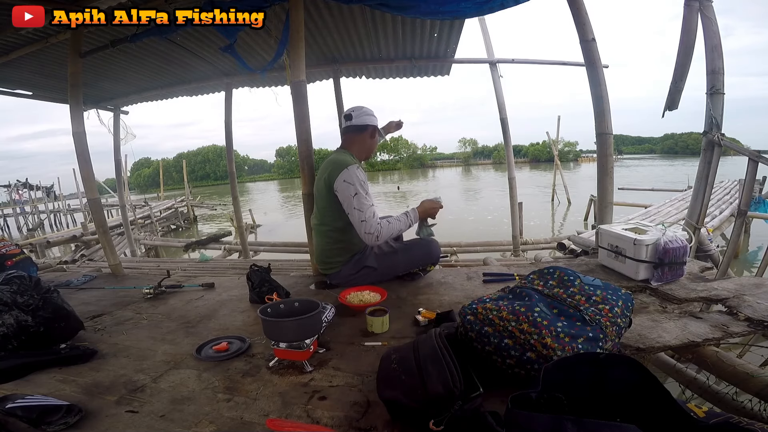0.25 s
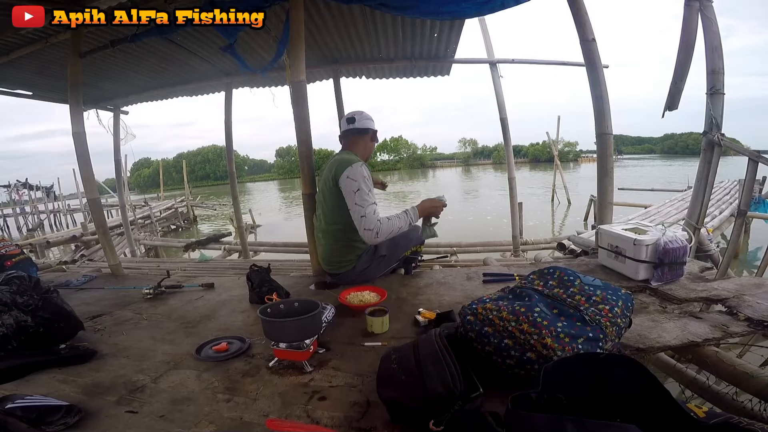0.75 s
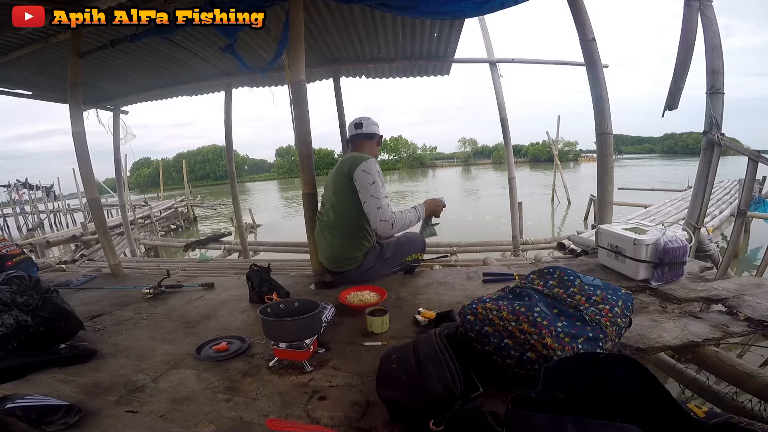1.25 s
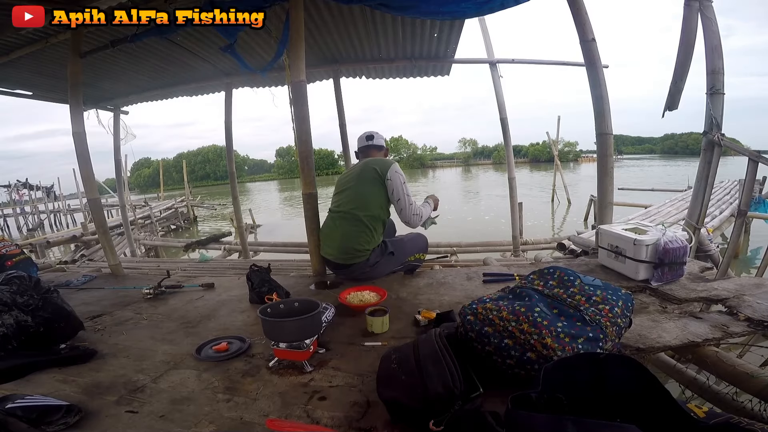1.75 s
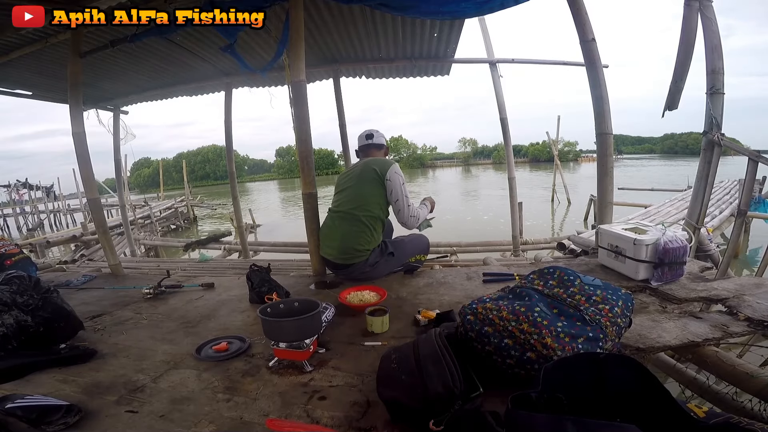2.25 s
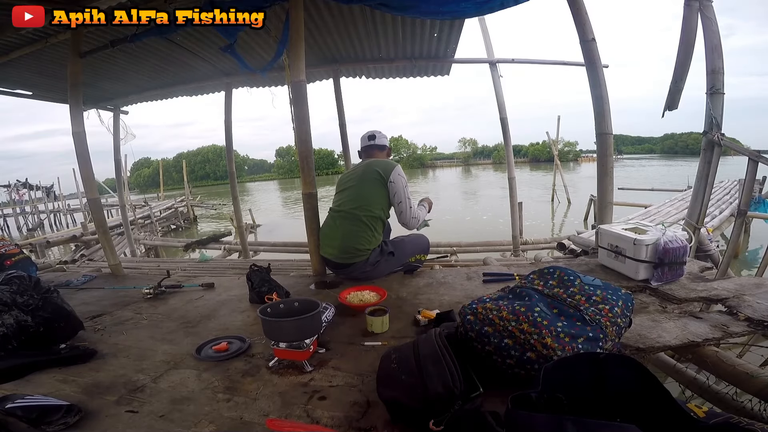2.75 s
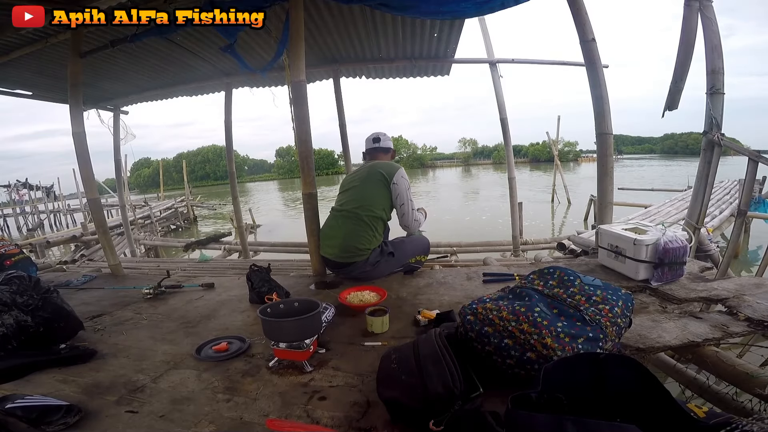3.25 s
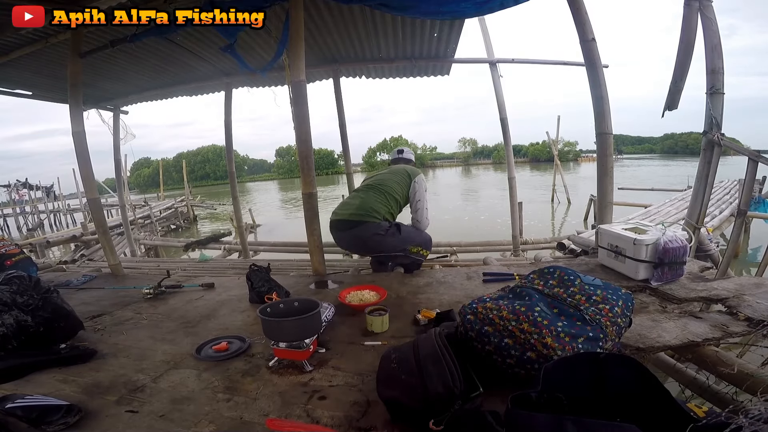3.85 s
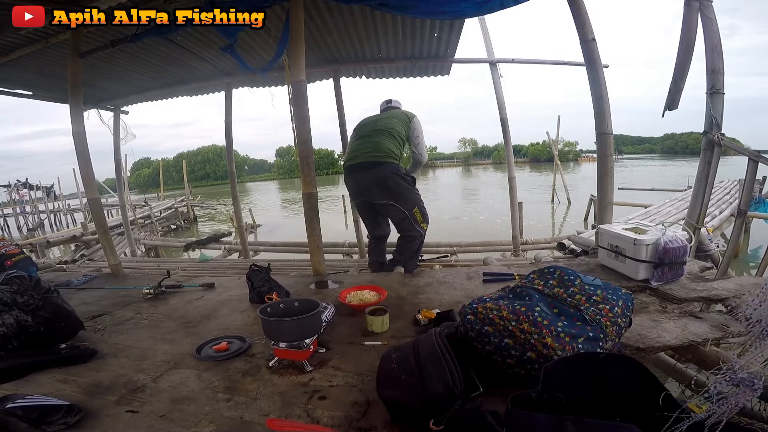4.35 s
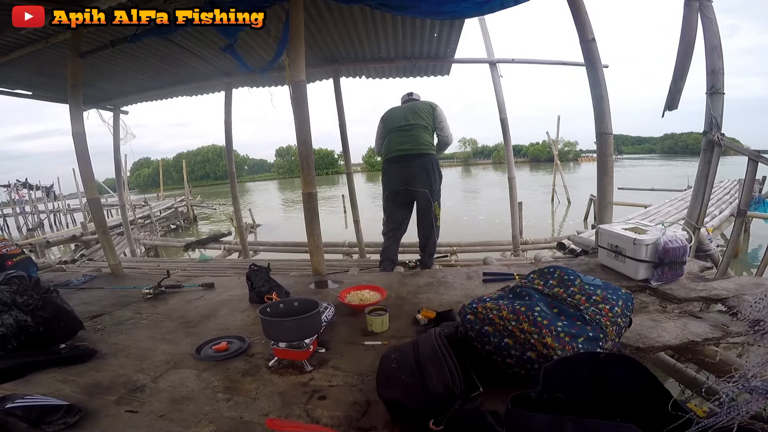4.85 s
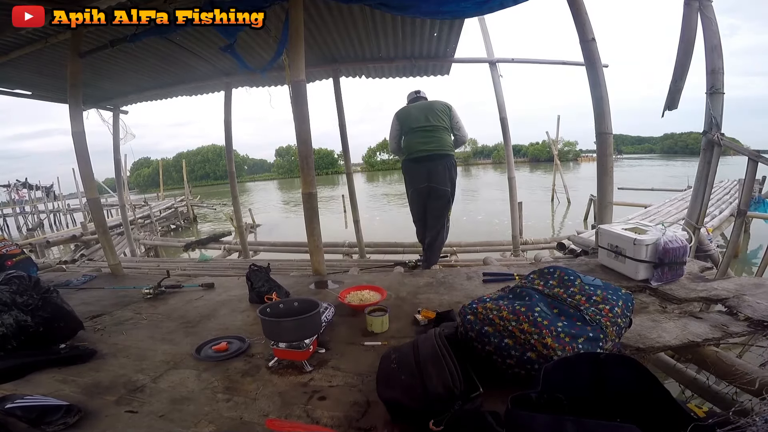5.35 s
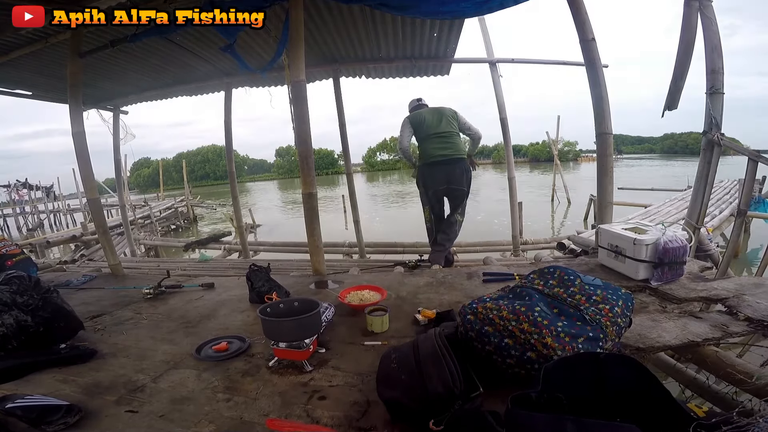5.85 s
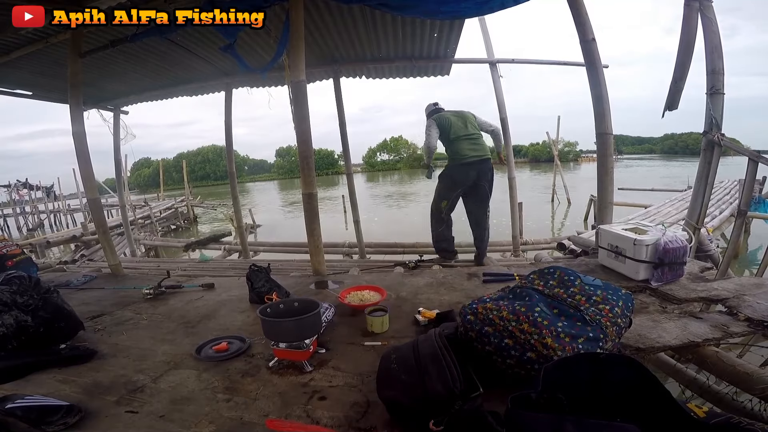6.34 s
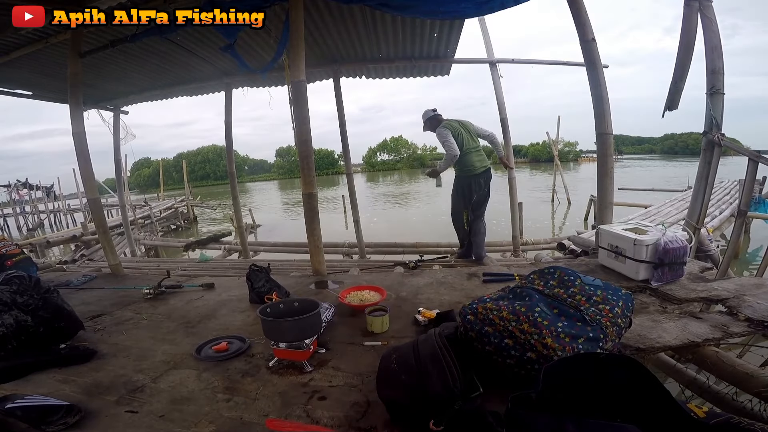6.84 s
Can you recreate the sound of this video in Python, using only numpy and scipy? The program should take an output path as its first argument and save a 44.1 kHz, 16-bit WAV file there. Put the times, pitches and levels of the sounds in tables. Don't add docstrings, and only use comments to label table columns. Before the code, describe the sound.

On an open waterside bamboo deck, a seated person shifts with dry cane cracks, faint cloth rubs and soft hollow knocks. After a quieter spell they rise and step, the deck giving deep booming thuds and a loud crack, then settling into lighter creaks. A far engine hums and ticks quickly beneath air and water hiss. The microphone rests on the deck, so low sway is strong.

```python
import sys
import numpy as np
from scipy import signal
from scipy.io import wavfile
from scipy.ndimage import uniform_filter1d

SR = 44100
rng = np.random.default_rng(int(sys.argv[2]) if len(sys.argv) > 2 else 0)


def wav_out(sig):
    wavfile.write(sys.argv[1], SR, np.round(np.clip(np.atleast_2d(sig).T, -1, 1) * 32767).astype(np.int16))


def nominal_scale(level):
    x = np.asarray(level, float) / 20
    return 10 ** x


N = 312228


def evened(x):
    return x / np.sqrt(np.mean(x ** 2) + 1e-20)


def add(mix, start_s, sound):
    part = mix[max(round(start_s * SR), 0):][:len(sound)]
    part += sound[:len(part)]


def ring(x, modes, shift=0.99, order=1):
    out = np.zeros(len(x))
    for hz, width_hz, db in modes:
        radius = np.exp(-np.pi * width_hz / SR)
        pole = radius * np.exp(2j * np.pi * hz * shift / SR)
        part = x + 0j
        for _ in range(order):
            part = signal.lfilter([1 - radius], [1, -pole], part)
        out += nominal_scale(db) * part.real
    return out


def summed(db):
    return 10 * np.log10(np.sum(10 ** (db / 10), axis=0))


def shaking(t):
    # top_s, sway_db, length_s, rocking_db (relative to sway)
    heaves = [(0.262, -49, 0.053, -6), (0.386, -38.5, 0.12, -17), (0.51, -37.5, .08, -24),
              (0.627, -40.5, 0.027, 8.5), (0.702, -33, 0.068, -15), (0.82, -37, 0.067, -8),
              (1.026, -37.5, 0.072, -4), (1.19, -37.5, 0.074, 1.5), (1.304, -54.5, .07, 16),
              (1.454, -46, 0.052, 9.5), (1.622, -34, 0.077, -3), (1.793, -42, 0.082, -7),
              (2.034, -39.5, 0.073, -9), (2.423, -42.5, 0.062, -16), (3.535, -46.5, 0.11, 3.5),
              (3.798, -27, 0.046, -6), (3.882, -26, 0.042, -9.5), (4.096, -37, 0.095, -4.5),
              (4.416, -36.5, .12, -18), (4.79, -20, 0.035, -8), (4.859, -24.5, 0.04, 2.5),
              (4.92, -26, 0.076, -5.5), (5.17, -32, 0.17, -1.5), (5.376, -17, .1, -13.5),
              (5.52, -22.5, 0.11, -3.5), (5.767, -36.5, 0.15, -1), (5.995, -33, 0.11, 2.5),
              (6.246, -35.5, 0.18, -13.5), (6.523, -35.5, .15, -5), (6.91, -35.5, 0.35, -8.5)]
    # top_s, beam_db, slat_db (relative to beam), die_away_db_per_s
    thuds = [(.30, -46.5, -21, 250), (.45, -44.5, -21.5, 150), (.68, -48, -12.5, 100), (.85, -53.5, -4, 80),
             (.95, -57, -6, 150), (1.2, -45.5, -3, 117), (1.32, -49, -18, 200), (1.6, -44.5, -23, 150),
             (1.73, -54.5, -30, 150), (1.91, -51.5, -12, 75), (2.52, -52.5, -27, 80), (2.64, -56, -8.5, 33),
             (3.69, -41, -13, 90), (3.81, -34.5, -17, 350), (3.881, -34.5, -26, 293),
             (4.1, -45.5, -30, 135), (4.32, -52.5, -25, 160), (4.47, -47, -30, 53), (4.78, -26.5, -26, 95),
             (5.0, -43.5, -18, 60), (5.26, -41, -23, 58), (5.33, -31, -5.5, 76), (5.38, -32, -15, 160),
             (5.48, -32, -31, 134), (5.602, -41.5, -34, 117), (5.818, -48, -39, 35), (6.05, -50, -2.5, 198),
             (6.11, -41, -28, 86), (6.64, -51, -20, 62), (7.04, -53, -6, 100)]
    # sway_db, rocking_db, beam_db, slat_db
    rest = (-52.5, -57.5, -64, -85.5)
    swell_db, settle = 11.5, 1.61
    load_db_per_s, slat_damping = 307, 1.63

    top_s, db, length_s, rock_db = np.transpose(heaves)[..., None]
    length_s = length_s * np.where(t > top_s, settle, 1)
    heave = db - swell_db * ((t - top_s) / length_s) ** 2

    top_s, db, slat_db, dying = np.transpose(thuds)[..., None]
    load = db - load_db_per_s * np.maximum(top_s - t, 0)
    after = dying * np.maximum(t - top_s, 0)

    moved = heave, heave + rock_db, load - after, load + slat_db - slat_damping * after
    return [summed(np.vstack([db, rest_db + 0 * t])) for db, rest_db in zip(moved, rest)]


def deck():
    # pitch_hz, width_hz, level_db
    groups = [
        [(27.59, 7.44, -1), (21.38, 6.4, -5), (33.82, 7.3, -8)],
        [(45.17, 9, -1.5), (55.1, 6.24, -3.5), (80.3, 13.7, -17)],
        [(108.7, 5.2, 0), (124.7, 11.9, 2), (145.3, 7.3, -6)],
        [(252.6, 17, -0.5)],
    ]
    # pitch_hz, width_hz, level_db
    loose = [(461, 96, 2.5), (530, 46, 4), (607, 200, -1)]
    t, out = np.arange(N) / SR, np.zeros(N)
    coarse_s = np.arange(0, N + 200, 200) / SR
    levels = shaking(coarse_s)
    for modes, level_db in zip(groups, levels):
        swing = evened(ring(rng.standard_normal(N + SR), modes, order=2)[SR:])
        swing /= (uniform_filter1d(swing ** 2, 5000) + 0.048) ** 0.37
        out += evened(swing) * nominal_scale(np.interp(t, coarse_s, level_db))
    buzz = evened(ring(rng.standard_normal(N), loose, order=2))
    beam_db = np.interp(t - .03, coarse_s, levels[2])
    return out + buzz * nominal_scale(-46.5 + 0.57 * beam_db)


def slips(count):
    slips_per_s = 2500
    size = rng.standard_normal(count) * nominal_scale(2.45 * rng.exponential(1, count))
    clicks = (rng.random(count) < slips_per_s / SR) * size
    return evened(clicks) + 1.4 * rng.standard_normal(count)


def burst(modes, db, t60, rise_s, shift=0.92, order=2):
    t = np.arange(16000) / SR
    fade_db = -60 * (t / max(t60, .02)) ** 1.43
    rung = evened(ring(slips(len(t)), modes, shift, order=order))
    return nominal_scale(db + fade_db) * rung * (1 - np.exp(-(t / rise_s) ** 2))


def scuff(start_s, ring_db, thick_db, fizz_db, t60):
    # pitch_hz, width_hz, level_db
    bodies = [
        [(4046, 610, 6), (3180, 200, -3.5)],
        [(1066, 110, 2), (1258, 210, 8), (1550, 157, 7)],
        [(2226, 1650, 5.5), (2450, 470, -5.5), (2770, 280, 0)],
        [(4990, 760, 8), (6300, 650, 6.5), (7130, 900, 4)],
    ]
    shift = rng.uniform(0.882, 1.04)
    rise_s = .008
    thin_db = -7 + 0.55 * min(thick_db, 0) - 0.42 * max(fizz_db, -30)
    out = burst(bodies[0], ring_db - 5, t60 * 0.93, rise_s, order=3)
    levels_db = thick_db - 5, thin_db - 1, fizz_db - 4.0
    lasting = 1.2, .95, .75
    for modes, db, last in zip(bodies[1:], levels_db, lasting):
        out = out + burst(modes, ring_db + db, t60 * last, rise_s, shift)
    return start_s - .003, out


def rub(start_s, ring_db, t60):
    return scuff(start_s, ring_db, thick_db=-6, fizz_db=-6, t60=t60)


def knock(start_s, db, hz, t60):
    # pitch_ratio, width_ratio, level_db
    stem = [(1.047, 0.17, 2), (0.82, 0.084, -2.5), (1.407, 0.27, -8), (1.69, 0.65, -13.5)]
    modes = [(hz * pitch, hz * width, mode_db) for pitch, width, mode_db in stem]
    return start_s - .004, burst(modes, db - 7, t60, 0.0018)


def twang(start_s, db, hz, t60):
    t = np.arange(20000) / SR
    fade_db = -60 * (t / max(t60, .05)) ** 1.32
    shape = nominal_scale(db + fade_db) * (1 - np.exp(-(t / 0.011) ** 2))
    return start_s - .005, shape * np.sin(2 * np.pi * (hz * t + rng.random()))


def snap(start_s, db, t60):
    # pitch_hz, width_hz, level_db
    fibre = [(9200, 2700, 1), (11900, 3600, -4)]
    return start_s, burst(fibre, db, t60, .004)


def engine_strokes():
    # pitch_hz, width_hz, level_db
    valve = [(7840, 1100, -2), (3560, 710, 5.5)]
    exhaust = [(1364, 300, -4), (2112, 38, 3), (3100, 340, -25), (3510, 460, -8)]
    # time_s, level_db
    carry = [(0, -67), (.87, -69), (1.0, -57.5), (3.6, -59), (3.95, -65), (4.2, -62.5), (5.45, -54.5),
             (5.9, -64), (6.5, -53.5), (7.08, -78)]
    first_s, stroke_s, uneven_s = .006, .14338, .002
    t, out = np.arange(3500) / SR, np.zeros(N)
    for start_s in np.arange(first_s, N / SR, stroke_s):
        late, hard, full = np.tanh(rng.standard_normal(3))
        tick_db = np.interp(start_s, *np.transpose(carry)) + 2.7 * hard
        puff_db = -60.5 + 1.96 * full
        air = rng.standard_normal((2, len(t)))
        tick = evened(ring(air[0], valve, order=2)) * np.exp(-((t - .003) / .003) ** 2)
        puff = evened(ring(air[1], exhaust)) * (t / 0.009) * np.exp(1 - t / 0.0095)
        stroke = nominal_scale(tick_db - 2.5) * tick + nominal_scale(puff_db - 3.0) * puff
        add(out, start_s + uneven_s * late - .003, stroke)
    return out


def drift(rate_hz):
    t = np.arange(0, N + 400, 200) / SR
    waves = np.zeros(len(t))
    for f in np.geomspace(rate_hz / 20, rate_hz, num=24):
        waves += np.sin(2 * np.pi * (f * t + rng.random())) / np.sqrt(f)
    return np.interp(np.arange(N) / SR, t, evened(waves))


def engine_hum():
    # pitch_hz, level_db
    (hz, db), = [(68, -46)]
    turns = np.cumsum(hz * (1 + 0.0022 * drift(2.986))) / SR
    return np.sqrt(2) * nominal_scale(db + .8 * drift(12)) * np.sin(2 * np.pi * turns)


def hiss():
    # pitch_hz, density_db (per Hz)
    colour = [(15, -12), (80, 14), (180, 5.5), (400, 2), (950, -4), (1280, -2), (1850, -5), (3000, -6.5),
              (3800, -4), (4400, -9.5), (7400, -14), (8000, -9.5), (8500, -14.5), (13800, -17.5),
              (15300, -22.5)]
    level_db = -63.5
    frames, hz = N // 128 + 5, np.fft.rfftfreq(512, 1 / SR)
    real, imaginary, patches = rng.standard_normal((frames, 257, 3)).T
    patches = uniform_filter1d(patches, size=6, axis=0)
    patches = evened(uniform_filter1d(patches, size=16, axis=1))
    f, db = np.transpose(colour)
    colour_db = np.interp(np.log(hz + 1), np.log(f), db)[:, None]
    lively = np.clip(1.5 - hz / 4000, .15, 1)[:, None]
    spectra = (real + 1j * imaginary) * nominal_scale(colour_db + 0.94 * lively * patches)
    noise = signal.istft(spectra, nperseg=512, noverlap=384)[1][:N]
    return nominal_scale(level_db + 3.0) * evened(noise)


def whine():
    # cycles_per_frame, level_db
    restarted = [(210.48, -80.3), (326, -95)]
    # frame_rate_multiple, level_db, first_below_db, above_db (first above
    # lies 8 dB lower)
    multiple, db, below_db, above_db = (421, -71, -88, -97)
    frame_hz = 29.97
    frames = np.arange(N) / SR * frame_hz + rng.random()
    out = nominal_scale(db) * np.cos(2 * np.pi * multiple * frames)
    for cycles, tone_db in restarted:
        out += nominal_scale(tone_db) * np.sin(2 * np.pi * cycles * (frames % 1))
    for k in range(1, 14):
        fade_db = 4.2 * np.log(k)
        out -= nominal_scale(below_db - fade_db) * np.cos(2 * np.pi * (multiple - k) * frames)
        out -= nominal_scale(above_db - 8 / k - fade_db / 2) * np.cos(2 * np.pi * (multiple + k) * frames)
    return np.sqrt(2) * out


def scene():
    # start_s, housing_ring_db, thick_cane_db and fizz_db (relative to the ring), t60_s
    cracks = [(0.2334, -72, 17.5, -27, .059), (1.157, -60, 5, -14, .1), (1.2464, -42, -2.5, -16, 0.1),
              (1.2614, -47, -17, -19, .1), (1.4074, -45.5, -19, -4, 0.094), (1.4185, -37, -34, -10, 0.045),
              (1.8242, -58, 11, -19, 0.078), (1.8675, -41.5, -7.5, -37, 0.08),
              (1.8878, -48.5, -9, -22, 0.074), (2.5571, -57, 9, -7, 0.2), (2.5838, -49.5, -20, -15, .12),
              (3.041, -53, 0, -16, 0.13), (3.6247, -52, 2, -7, 0.13), (3.6669, -45, -5, -10, .12),
              (3.699, -53.5, -16, -11, .33), (3.786, -50.5, -36, -13, 0.12), (3.8522, -53.5, 10, -9, 0.064),
              (4.1614, -52, -25, 4, .058), (4.6514, -56, -17, -9, 0.22), (4.7357, -42, -5, -19, 0.095),
              (5.3081, -35, -8.5, -11.5, 0.13), (5.9614, -54.5, -0.5, -7, 0.078),
              (6.745, -54, -24, -21, 0.049), (7.004, -58, -20, -6, 0.55)]
    # start_s, housing_ring_db, t60_s
    rubs = [(.2915, -62, .12), (.335, -62, 0.29), (.5786, -63, 0.45), (.6759, -58.5, 0.2),
            (1.984, -67, .12), (2.4406, -59, 0.12), (2.9911, -53, 0.068), (3.7426, -50, 0.13),
            (4.3374, -67, .22), (4.685, -59, 0.29), (5.2737, -58, 0.16), (5.8817, -50, 0.054),
            (6.0334, -56, 0.088), (6.3909, -64, 0.11), (7.0337, -63, 0.21), (7.0594, -54, .16)]
    # start_s, peak_db, main_mode_hz, t60_s
    knocks = [(0.234, -50, 585, 0.17), (0.585, -52, 644, 0.18), (1.162, -55.5, 434, 0.42),
              (1.253, -49.5, 473, 0.13), (1.873, -47, 412, 0.12), (2.559, -54, 530, 0.31),
              (3.635, -45, 530, 0.27), (3.674, -50.5, 429, 0.39), (3.855, -40.5, 625, 0.095),
              (4.451, -69, 410, 0.12), (4.736, -42.5, 496, 0.19), (4.869, -51.5, 417, 0.19),
              (5.313, -35.5, 428, 0.19), (6.044, -46.5, 460, 0.14), (7.062, -52, 447, 0.17)]
    # start_s, peak_db, pitch_hz, t60_s
    twangs = [(.22, -60, 207, 0.16), (.585, -46.5, 174, 0.2), (.60, -56.5, 293, 0.29), (.72, -64, 334, 1.2),
              (.87, -59.5, 307, 0.51), (1.155, -52, 323, 0.35), (1.155, -53, 184, 0.23),
              (1.62, -59.5, 338, 0.25), (1.88, -57, 287, 0.25), (1.95, -70, 475, 0.97),
              (2.56, -55, 217, 0.22), (3.05, -58.5, 295, 0.36), (3.64, -55, 337, 0.38),
              (3.64, -50, 176.4, 0.29), (4.735, -48, 186, 0.18), (4.735, -33, 117.5, .3),
              (4.735, -45.5, 435, 0.16), (4.76, -52.5, 319, 0.27), (5.308, -42, 195, 0.19),
              (5.308, -43, 324, 0.21), (5.31, -44.5, 495, 0.15), (3.853, -44, 1214, 0.078),
              (6.04, -59, 179, 0.21), (7.02, -56, 203, .3), (4.86, -59, 250, .9), (5.1, -62, 253, .9),
              (1.869, -40, 2150, .05), (5.314, -35, 3930, 0.058), (5.33, -31.5, 117.4, 0.58),
              (.232, -49, 592, .07)]
    # start_s, level_db, t60_s
    snaps = [
        (1.410, -58, 0.068),
    ]
    mix = deck() + engine_strokes() + engine_hum() + hiss() + whine()
    for events, source in ((cracks, scuff), (rubs, rub), (knocks, knock), (twangs, twang), (snaps, snap)):
        for event in events:
            add(mix, *source(*event))
    return mix[None]


def roll_off(x):
    return signal.sosfilt(signal.butter(12, 15180, fs=SR, output="sos"), x)


def record(dry):
    ceiling = .4
    return roll_off(ceiling * np.tanh(dry / ceiling))


dry = scene()
out = record(dry)
wav_out(out)
```